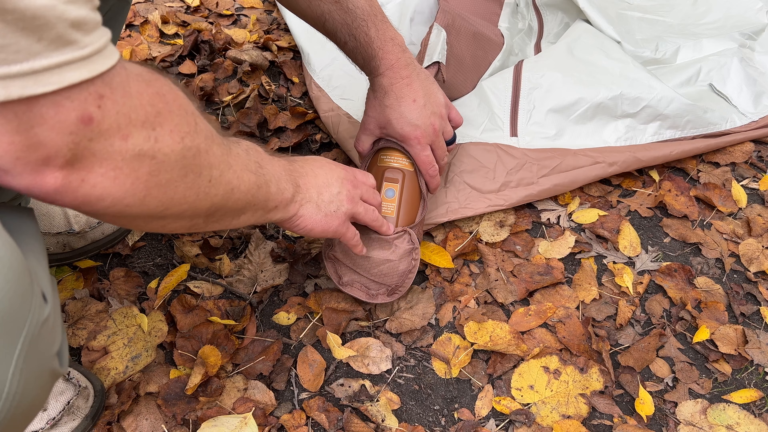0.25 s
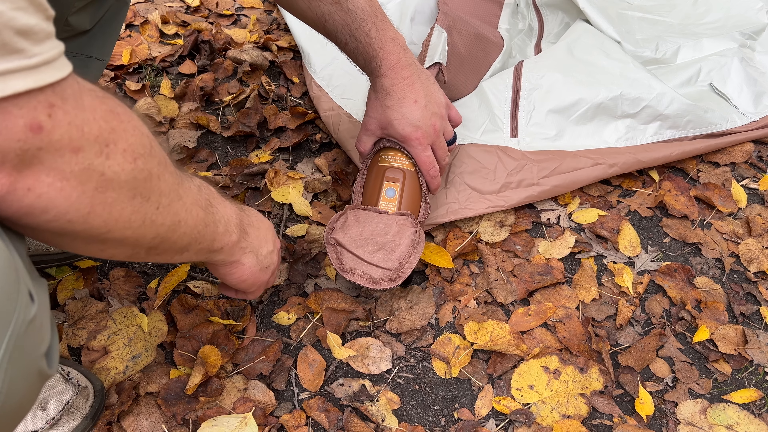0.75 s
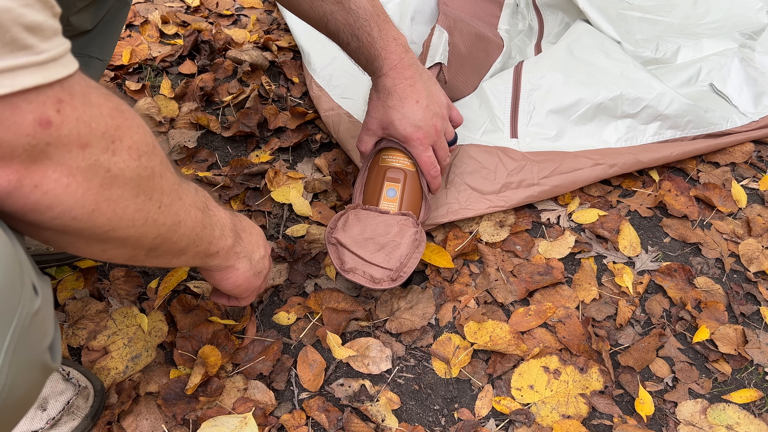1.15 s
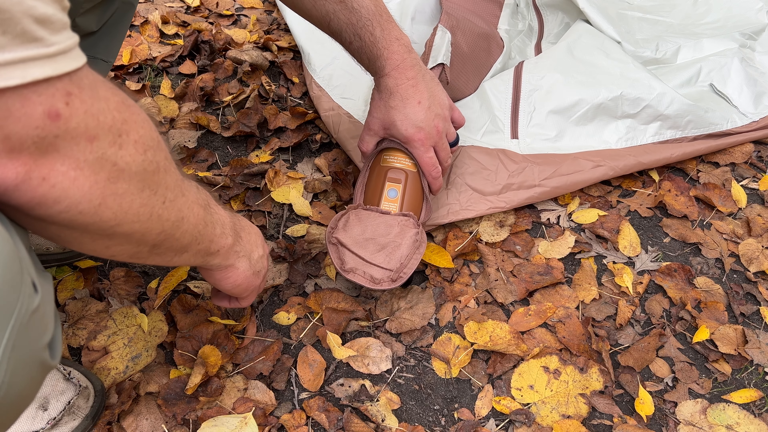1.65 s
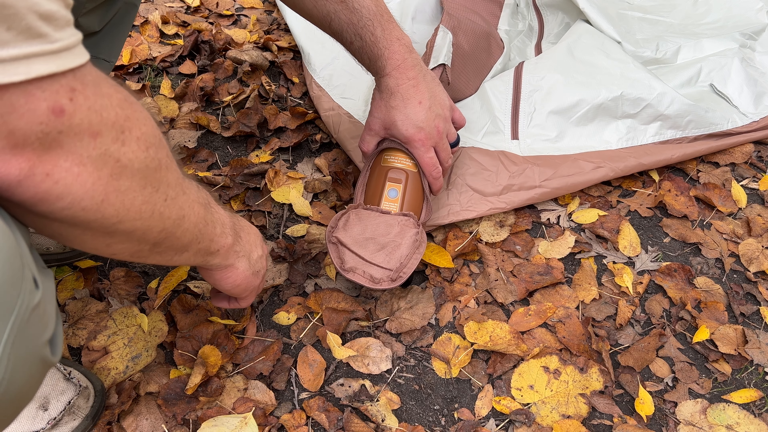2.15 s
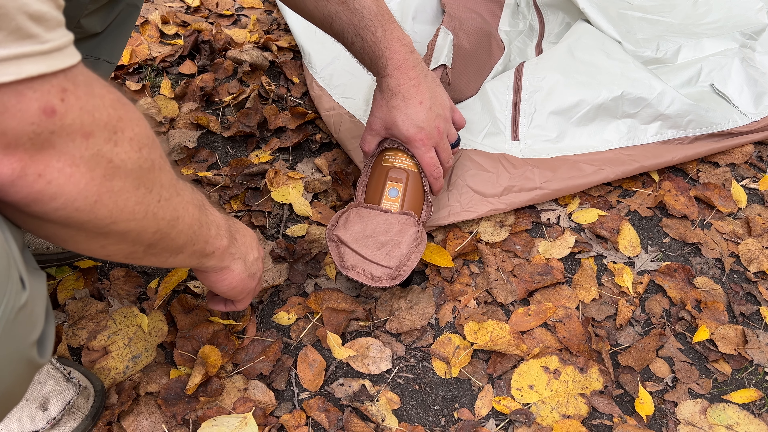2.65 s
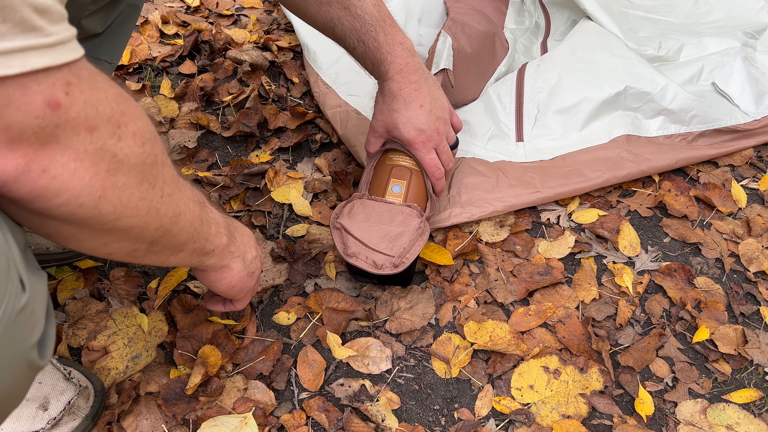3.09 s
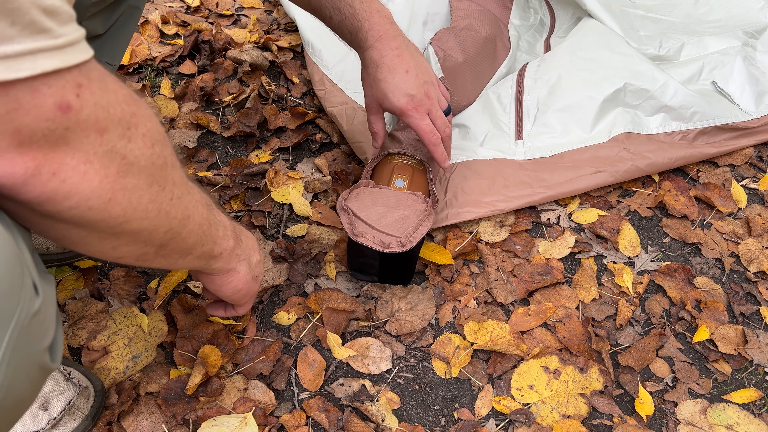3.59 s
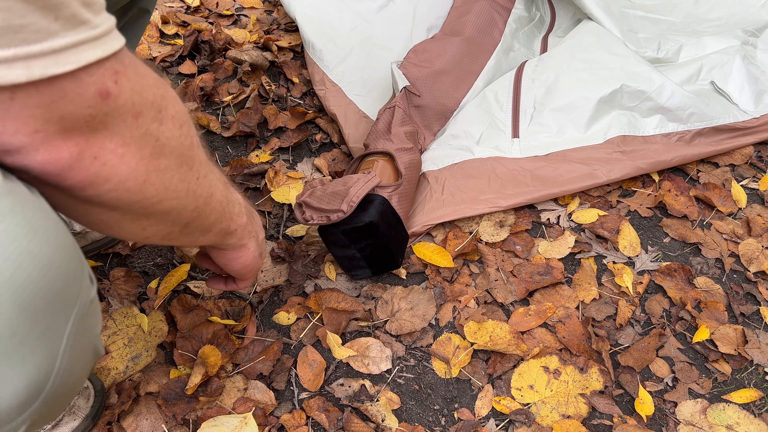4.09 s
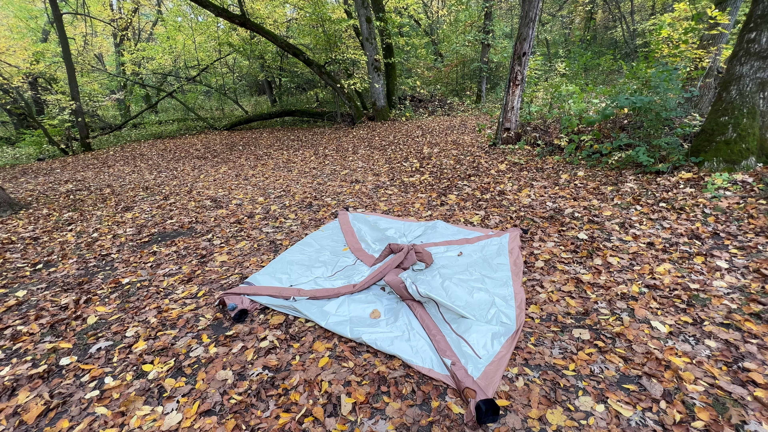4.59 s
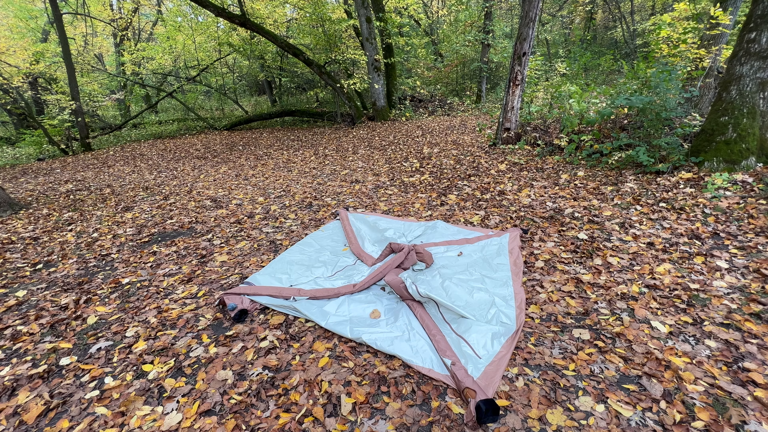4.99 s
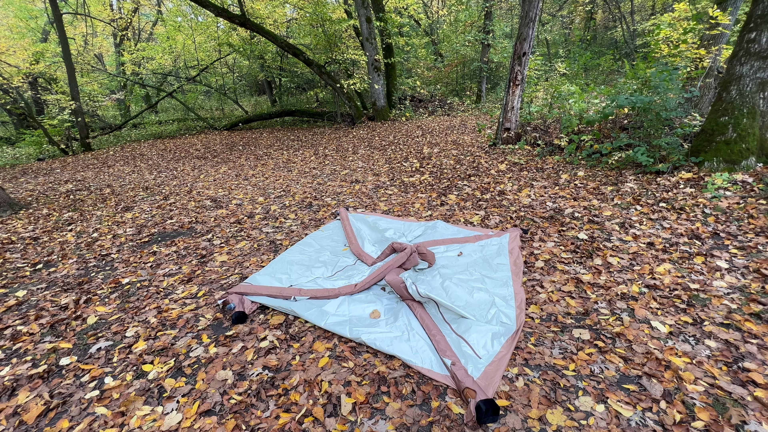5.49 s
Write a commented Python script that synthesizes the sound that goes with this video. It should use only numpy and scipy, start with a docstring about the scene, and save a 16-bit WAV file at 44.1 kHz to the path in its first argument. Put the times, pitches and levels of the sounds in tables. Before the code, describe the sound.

Close, throbbing hum of an electric pump inflating a tent, with cloth flutter and finger clicks, then a fainter fan whine, crinkles and birds.

```python
"""A small electric pump blows up a tent on a forest floor. Up close it hums, throbs once per turn and
rushes air, while its cloth cover flutters in the draught and fingers click on the case. Near 3 s a hand
pulls the cover back: the flutter stops, a slit whistles and the motor runs a little faster. At 4.3 s we
are abruptly a few steps from the tent: a thin fan whine, fabric crinkling as it fills, two faint birds.
"""
import sys
import numpy as np
from scipy import signal
from scipy.fft import rfft, irfft, next_fast_len
from scipy.io import wavfile
from scipy.ndimage import uniform_filter1d, map_coordinates

SR = 44100
rng = np.random.default_rng(int(sys.argv[2]) if len(sys.argv) > 2 else 0)


def persist_wave(psi):
    """Save psi, clipped to +-1, as 16-bit WAV."""
    counts = np.round(np.clip(psi, -1, 1) * 32767).astype(np.int16)
    wavfile.write(sys.argv[1], SR, np.atleast_2d(counts).T)


N = 253134
TIME = np.arange(N) / SR
SIDES = np.array([[.5], [-.5]])  # splits a difference between left and right


def amp(db):
    """Decibels to gain."""
    return 10 ** (np.asarray(db) / 20)


def unit(x):
    """Scale to rms 1."""
    return x / np.sqrt(np.mean(x ** 2) + 1e-20)


def curves(rows):
    """One value per sample for each column after the time."""
    times, *columns = np.transpose(rows)
    return [np.interp(TIME, times, column) for column in columns]


def wobble(rate):
    """A smooth random curve, rate knots a second."""
    return map_coordinates(rng.standard_normal(int(N * rate / SR) + 4), [TIME * rate])


def angle(hz):
    """The running phase of a changing frequency."""
    return 2 * np.pi * np.cumsum(hz) / SR


def swell(centre_s, half_width_s, db):
    """A bell-shaped envelope."""
    return amp(db) * np.exp(-((TIME - centre_s) / half_width_s) ** 2)


def bursts(events, rise_s, decay_s):
    """An envelope of short snaps at (start_s, level_db), each dying by 60 dB in decay_s."""
    age = np.arange(SR // 10) / SR
    shape = (1 - np.exp(-age / rise_s)) * amp(-60 * age / decay_s)
    kicks = np.bincount([round(s * SR) for s, db in events], [amp(db) for s, db in events], N)[:N]
    return signal.fftconvolve(kicks, shape / shape.max())[:N]


def filtered(x, response):
    """Shape x by a frequency response."""
    size = next_fast_len(N + SR // 4)
    return irfft(rfft(x, size) * response(np.fft.rfftfreq(size, 1 / SR)), size)[..., :N]


def along(points, hz):
    """Read (freq_hz, value) points on a log axis."""
    freqs, values = np.transpose(points)
    return np.interp(np.log(hz + 1), np.log(freqs + 1), values)


def colour(points):
    """The response of an EQ curve of (freq_hz, gain_db) points."""
    return lambda hz: amp(along(points, hz))


def resonances(modes):
    """The response of a few broad resonances."""
    return lambda hz: sum(amp(db) / (1 + (2 * (hz - centre) / width) ** 2) for centre, width, db in modes)


def grains(envelope, spectrum):
    """Spurts of noise that ring through a body; the envelope is their rms."""
    response = colour(spectrum)
    gain = np.sqrt(np.mean(response(np.linspace(0, SR / 2, SR // 20)) ** 2))
    return filtered(envelope * rng.standard_normal(N), response) / gain


def placed(x, lead_s, pan):
    """The left ear hears x earlier; pan sets the balance by frequency."""
    return filtered(x, lambda hz: amp(SIDES * along(pan, hz)) * np.exp(2j * np.pi * hz * SIDES * lead_s))


# stereo width of the air beside the pump: freq_hz, side_db
NEAR_WIDTH = [(100, -12.5), (400, -18.5), (800, -6), (1300, -17.5), (2400, -9), (4000, -6), (5500, -3),
              (8500, -8.5), (10000, 20.5), (12000, -13.5), (15000, -7.5)]

def noise(response, width=NEAR_WIDTH):
    """Stereo noise of rms 1; width gives its side level by frequency."""
    mid, side = filtered(rng.standard_normal((2, N)), response)
    side = filtered(side, colour(width))
    return unit(np.array([mid + side, mid - side]))


# tones of the pump: turn_multiple, covered_db, open_db, throb_depth (0-1)
PUMP_TONES = [(6, -16, -9, 0.05), (7, -12, -19, 0.08), (11, -19, -15, 0.16), (12, -1, 1.5, 0.34),
              (14, -29, -28.5, 0.19), (18, -19, -13, 0.26), (23, -29, -20, 0.23), (25, -11, -3.5, 0),
              (27, -21.5, -17, 0), (29, -21.5, -54.5, 0), (30, -50, -10, 0.3), (33, -32.5, -38.5, 0.74),
              (35, -35.5, -24, 0.4), (45, -25.5, -29.5, 0.4), (48, -34, -25.5, 0)]

def hum(turn, opening, fingers):
    """Tones throb once a turn over a weak rattle; fingers on the switch damp them both."""
    gain = amp(-44 - 3.6 * opening - 7.5 * fingers + 0.2 * wobble(38))
    tones = rattle = 0
    for k, covered_db, open_db, throb in PUMP_TONES:
        level = amp(covered_db + opening * (open_db - covered_db) + 0.47 * wobble(7))
        tones += level * (1 + throb * np.cos(turn)) * np.sin(round(k) * turn)
    for k in range(8, 56):
        rattle += amp(-.17 * k) * np.sin(k * turn + rng.uniform(0, 2 * np.pi) + 0.92 * wobble(5.22))
    return gain * np.sqrt(2) * (tones + amp(-27 + 4.6 * opening) * rattle)


# the cover is held, let go, settles, billows, eases, is lifted, dropped and pulled clear:
# start_s, flap_hz, flutter_db, slack (0-1), motor_relief (0-1)
GRIPS = [(0, 65.5, -42.5, .95, 0.45), (.268, 89, -39.5, 0.46, 0.01), (.372, 94.6, -48, 0.05, 0.04),
         (1.25, 91.5, -45.5, 0.13, 0.04), (2.1, 92.7, -49, 0, 0), (2.77, 72, -54, 0.4, 0.76),
         (2.86, 93, -45.5, 0.24, 0.1), (3.04, 93, -110, 0, 0.99)]

def cover(settle_s=0.0339):
    """Flap rate, flutter gain, slack and motor relief: the cloth settles into each grip and holds it."""
    start_s, flap_hz, db, slack, relief = np.transpose(GRIPS)
    grip = np.searchsorted(start_s[1:], TIME)
    states = np.array([flap_hz, amp(db), slack, relief])
    flap_hz, gain, slack, relief = uniform_filter1d(states[:, grip], size=round(settle_s * SR), axis=1)
    return flap_hz, gain, np.clip(slack, 0, 1), relief


# harmonics of the cloth's swing: flap_multiple, taut_db, slack_db
FLAP_HARMONICS = [(1, 0.5, -7), (2, -10, 0), (3, -16, -2.5), (4, -21, -7.5), (5, -33.5, -14)]

def flutter(flap, flap_hz, slack, fingers, slap_hz=1850):
    """The cover swings in the draught; slack, it slaps the case once a swing, softer as fingers leave."""
    swing = 0
    for k, taut_db, slack_db in FLAP_HARMONICS:
        level = amp(taut_db + slack * (slack_db - taut_db) + 1.205 * wobble(28.16))
        swing += level * np.sin(round(k) * flap + rng.uniform(0, 2 * np.pi))
    since_slap_s = (flap + np.pi / 2) % (2 * np.pi) / (2 * np.pi * flap_hz)
    age = since_slap_s / 0.00054  # the ring peaks at age 2, about 1 ms in
    envelope = (age / 2) ** 2 * np.exp(2 - age)
    ring = envelope * np.sin(2 * np.pi * slap_hz * (1 + 0.022 * wobble(60)) * since_slap_s)
    slaps = slack ** 2 * amp(6 + 4 * fingers + 1.2 * wobble(68)) * ring
    return np.sqrt(2) * swing * amp(1.5 * (1 - slack) * wobble(13)) + slaps


# resonances of the air path, covered and open: centre_hz, width_hz, gain_db
DUCT_COVERED = [(1660, 280, 1), (2344, 222, 7), (2915, 163, -4), (3410, 410, -8)]
DUCT_OPEN = [(1720, 310, -0.5), (2360, 860, -3), (2815, 650, 3), (3070, 350, 2), (3910, 700, -8)]

def duct_rush(turn, flap, opening, slack):
    """Air rings in the duct, chopped and stirred by the cloth; uncovering it moves the resonances up."""
    covered = noise(resonances(DUCT_COVERED)) * (1 + 0.33 * np.cos(flap))
    uncovered = noise(resonances(DUCT_OPEN)) * (1 + 0.09 * np.cos(turn))
    gain = amp(-56.5 + 1.3 * opening + 5 * slack)
    return gain * (np.sqrt(1 - opening) * covered + np.sqrt(opening) * uncovered)


# the draught's body and its low buffeting: freq_hz, gain_db
BODY_EQ = [(30, -38), (80, -3), (200, -5), (330, -4.5), (480, 0.5), (620, -8), (780, -12.5), (950, -6),
           (1150, -9), (1400, -16), (2200, -17.5), (5000, -72)]
BUFFET_EQ = [(15, -7), (35, -9), (58, 5), (85, -4.5), (130, -17), (250, -45), (600, -77.5)]
# the cover spills air: centre_s, half_width_s, level_db
GUSTS = [(.17, .07, -52), (.275, 0.033, -44), (1.41, 0.04, -47), (2.76, 0.03, -54), (3.14, .04, -56)]

def draught(opening):
    """A broad rush, softer once uncovered, over gusty turbulence round the cover."""
    body = amp(-50.5 - 4.5 * opening + 1.45 * wobble(24.61)) * noise(colour(BODY_EQ))
    turbulence = amp(-61 + 3 * wobble(11)) + sum(swell(*gust) for gust in GUSTS)
    return body + turbulence * noise(colour(BUFFET_EQ))


# the hiss, comb-notched at the top: freq_hz, gain_db
HISS_EQ = [(1000, -24.5), (3000, 6.5), (4600, 6), (6000, 3), (8500, 1.5), (9500, 0), (10200, -30),
           (10700, -2), (11300, 5.5), (12900, -3), (13600, -35), (14200, -24.5), (14700, 1), (15600, 2)]
# its width, greatest in the notches: freq_hz, side_db
HISS_WIDTH = [(4000, -7.5), (5500, -0.5), (7500, -8.5), (8500, -4), (9500, 3), (10200, 9), (10700, 3.5),
              (11300, 3.5), (12100, -19.5), (12900, -2.5), (13600, 19), (14200, 15), (14700, 2),
              (15600, -20.5)]
# sizzle of the weave: centre_hz, width_hz, gain_db
WEAVE_BANDS = [(11460, 800, 1), (15400, 800, 0.5)]

def hiss(flap, opening, slack, clear_s=3.2, fade_s=.2):
    """Air hisses, pulsing with each flap, and sizzles through the weave until the cloth is clear."""
    in_stream = np.clip((clear_s - TIME) / fade_s, 0, 1)
    gain = amp(-64.2 + 0.7 * opening - (1 - in_stream) + 1.1 * wobble(4))
    pulse = 1 + .18 * (1 - opening) * np.cos(flap)
    stream = gain * pulse * noise(colour(HISS_EQ), HISS_WIDTH)
    sizzle = noise(resonances(WEAVE_BANDS), width=[(11000, -2.5), (15000, -10)])
    return stream + amp(-73 + 3 * np.sqrt(opening)) * in_stream * np.sqrt(1 - slack) * sizzle


# finger taps: start_s, level_db
CLICKS = [(0.146, -30), (0.365, -48), (3.688, -43.5), (3.7236, -43.5), (3.903, -43)]
# tone of the pump's case: freq_hz, gain_db
CASE_EQ = [(300, -32), (1500, 3), (3000, 1.5), (4200, 2), (5500, -0.5), (7500, -11), (12000, -22),
           (16000, -35)]

def finger_clicks():
    """Fingers tap the case, which rings briefly."""
    return grains(bursts(CLICKS, rise_s=0.0018, decay_s=0.014) * amp(-7), CASE_EQ)


# strokes over the cloth: centre_s, half_width_s, level_db, centre_hz, width_hz
RUBS = [(0.325, 0.03, -60.5, 5500, 7000), (.369, .007, -60, 14600, 300), (.4, .015, -65.5, 6000, 6000),
        (2.855, .012, -53.5, 2200, 800), (2.87, .05, -68, 8300, 2500), (3.13, .08, -69, 8500, 6000),
        (3.36, 0.03, -63.5, 8600, 6000), (3.602, 0.14, -68.5, 6280, 900), (3.743, .012, -62, 2000, 1200),
        (3.8, 0.08, -60, 8200, 3500), (3.81, .06, -64, 12000, 2500)]

def cloth_rubs():
    """The hand slides over the cloth: grainy bands of noise with the same notches as the hiss."""
    rubs = 0
    for centre_s, half_width_s, db, centre_hz, width_hz in RUBS:
        band = resonances([(centre_hz, width_hz, 0)])
        friction = noise(lambda hz: band(hz) * colour(HISS_EQ)(hz), HISS_WIDTH)
        rubs += swell(centre_s, half_width_s, db) * friction
    return rubs * amp(2.7 * wobble(200))


# soft thuds: centre_s, half_width_s, level_db, pitch_hz
BUMPS = [(2.28, 0.019, -45, 149), (2.858, 0.025, -45, 140), (3.023, 0.016, -45.5, 142),
         (3.462, 0.029, -41.5, 59), (3.726, .02, -52, 115), (3.791, 0.03, -39.5, 57.8)]

def cover_bumps(rough_rad=0.53):
    """The cover bumps against the hand; the cloth scatters the pitch of each thud."""
    bumps = 0
    for centre_s, half_width_s, db, hz in BUMPS:
        phase = 2 * np.pi * hz * (TIME - centre_s) + rough_rad * wobble(130)
        bumps += swell(centre_s, half_width_s, db) * np.sin(phase)
    return np.sqrt(2) * bumps


def slit_whistle(turn, start_s=2.96, end_s=3.68, rise_s=0.17, fall_s=0.14, blades=12):
    """A slit by the half-lifted cover whistles, higher as it widens, and lets out a hum overtone."""
    age = TIME - start_s
    gate = np.clip(np.minimum(age / rise_s, (end_s - TIME) / fall_s), 0, 1)
    pitch_hz = 2486 + 800 * age + 70 * wobble(120)
    whistle = np.sin(angle(pitch_hz)) * unit(amp(5.2 * wobble(90)))
    overtone = amp(-3) * (1 + .3 * np.cos(turn)) * np.sin(4 * blades * turn)
    return np.sqrt(2) * amp(-62) * gate * (whistle + overtone)


# how far the cover is off: time_s, opening (0-1)
OPENING = [(0, 0), (2.7, 0.1), (3.08, 0.65), (3.6, 0.95), (3.85, 0.97), (4.3, 0.98)]
# balance beside the pump: freq_hz, left_over_right_db
NEAR_PAN = [(60, 0.5), (130, 0.5), (290, 0.0), (640, 0), (1410, 3), (3100, 0.5), (6820, 3), (15000, -1.5)]

def near_pump(warm_turn_hz=35.4, warm_up_s=2.2, fingers_off_s=0.44):
    """The pump at arm's length: it creeps up to its warm speed and runs faster when it can breathe."""
    opening = curves(OPENING)[0]
    fingers = np.clip(1 - TIME / fingers_off_s, 0, 1)
    flap_hz, flap_gain, slack, relief = cover()
    turn_hz = warm_turn_hz - 1.25 * np.exp(-TIME / warm_up_s) + 1.03 * relief
    turn = angle(turn_hz * (1 + 0.00098 * wobble(15) + .002 * wobble(90)))
    flap = angle(flap_hz * (1 + .018 * wobble(30)))
    tones = hum(turn, opening, fingers) + slit_whistle(turn)
    cloth = flap_gain * flutter(flap, flap_hz, slack, fingers)
    air = duct_rush(turn, flap, opening, slack) + draught(opening) + hiss(flap, opening, slack)
    hand = finger_clicks() + cloth_rubs() + cover_bumps()
    return placed(tones + cloth + air + hand, lead_s=.00002, pan=NEAR_PAN)


# the whine creeps up in pitch, then jumps lower at an abrupt cut: time_s, fundamental_hz
WHINE_PITCH = [(4.5, 1114.8), (4.9, 1118), (5.38, 1117.7), (5.684, 1121.6), (5.69, 1093.1)]
# its partials: harmonic, level_db, left_over_right_db
FAN_WHINE = [(6, -69, 3.5), (7, -73, 2.5), (8, -80, -0.5), (10, -79.5, 1.5), (11, -65, 1.5), (12, -55, -4),
             (13, -66.5, -1.5)]
# its airy bed: freq_hz, gain_db
FAR_AIR_EQ = [(100, -39), (400, -41), (800, -10), (1500, 1), (3000, -3), (6000, -6.5), (9500, 0.5),
              (12000, -4), (14000, -5.5), (16000, -13.5)]

def far_fan(left_lead_rad=0.82):
    """High harmonics of a fast fan over a faint hiss."""
    turn = angle(curves(WHINE_PITCH)[0] * (1 + 0.0003 * wobble(15) + .0002 * wobble(420)))
    whine = 0
    for k, db, pan_db in FAN_WHINE:
        level = amp(db + SIDES * pan_db + .5 * wobble(3.4))
        whine += level * np.sin(round(k) * turn + SIDES * left_lead_rad)
    air = amp(-67 + SIDES * 1.9) * noise(colour(FAR_AIR_EQ), width=[(1000, -7)])
    return np.sqrt(2) * whine + air


# creases that snap: start_s, level_db
CREASES = [(4.3266, -40), (4.373, -39.5), (4.4782, -44.5), (4.521, -44.5), (4.9392, -42), (5.008, -43.5),
           (5.0216, -45), (5.0564, -44), (5.103, -42), (5.1404, -42.5), (5.176, -39), (5.259, -40),
           (5.3316, -40), (5.3387, -45), (5.3802, -38), (5.4001, -43), (5.4837, -46.5), (5.6981, -38.5)]
# the rustle under them: time_s, level_db
RUSTLE = [(4.36, -66.5), (4.594, -66), (4.858, -70), (5.2, -61), (5.432, -68), (5.74, -64.5)]
# tone of the fabric: freq_hz, gain_db
TENT_EQ = [(200, -48), (500, -37), (800, -19), (1200, -7), (1700, 1), (2400, -1), (3500, -5), (6000, -11),
           (9000, -16.5), (12000, -26), (16000, -42.5)]
# the tent sits to the left: freq_hz, left_over_right_db
TENT_PAN = [(400, 3), (1500, 7), (8000, 6.5)]

def tent():
    """Creases snap as the fabric fills, over a crowd of tiny crinkles."""
    snaps = bursts(CREASES, rise_s=.002, decay_s=0.018) * amp(-9.5)
    # a brief soft blur of noise around each snap
    blur = np.sqrt(abs(uniform_filter1d(snaps ** 2, size=SR // 60))) * amp(-4)
    crinkles = amp(curves(RUSTLE)[0]) * unit(amp(1.8 * wobble(70) + 4 * wobble(500)))
    stir = np.sqrt(snaps ** 2 + blur ** 2 + crinkles ** 2)
    scattered = np.array([grains(stir, TENT_EQ), grains(stir, TENT_EQ)])
    return placed(grains(stir, TENT_EQ) + amp(-6.5) * scattered, lead_s=.00004, pan=TENT_PAN)


# two faint songs: time_s, pitch_hz, level_db
LOW_BIRD = [(4.72, 3000, -88), (4.77, 3020, -65.5), (4.835, 2970, -67), (4.88, 2970, -89)]
HIGH_BIRD = [(4.74, 5650, -87), (4.81, 5600, -78), (4.87, 5480, -78), (4.93, 5420, -73), (4.98, 5520, -78),
             (5.3, 5552, -82), (5.48, 5560, -76.5), (5.56, 4740, -77), (5.62, 4400, -90)]

def bird(song):
    """A thin, wavering whistle among the trees."""
    hz, db = curves(song)
    singing = (TIME > song[0][0]) & (TIME < song[-1][0])
    return singing * amp(db + 1.8 * wobble(60)) * np.sin(angle(hz * (1 + 0.005 * wobble(80))))


def scene():
    """First beside the pump, then abruptly a few steps from the tent."""
    cut_s, crossfade_s = 4.319, 0.0032
    far = np.clip((TIME - cut_s) / crossfade_s, 0, 1)
    return (1 - far) * near_pump() + far * (far_fan() + tent() + bird(LOW_BIRD) + bird(HIGH_BIRD))


def record(dry):
    """A hard high cut at 15.8 kHz."""
    return filtered(dry, lambda hz: hz < 15800)


dry = scene()
out = record(dry)
persist_wave(out)
```